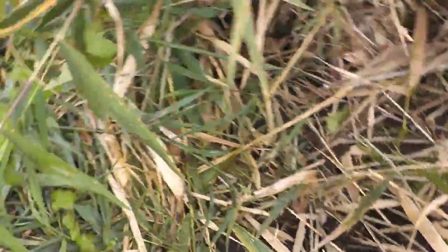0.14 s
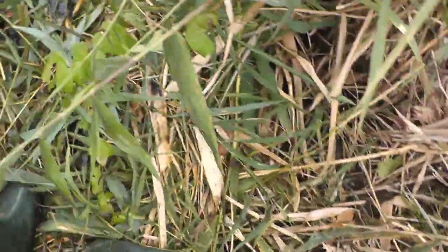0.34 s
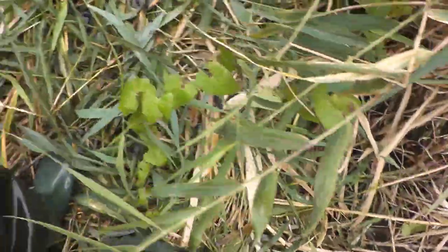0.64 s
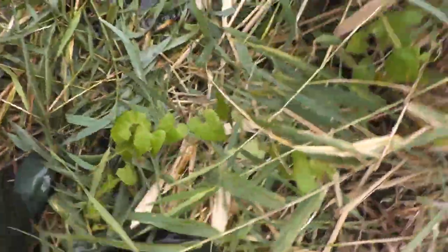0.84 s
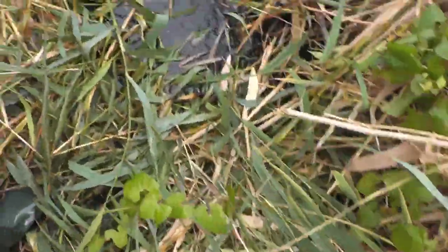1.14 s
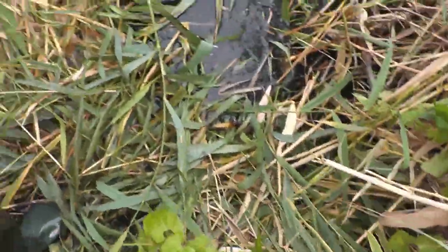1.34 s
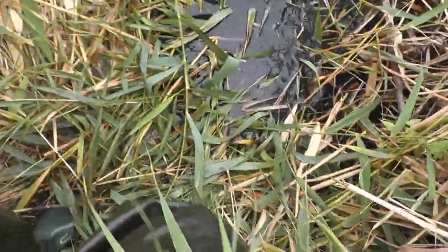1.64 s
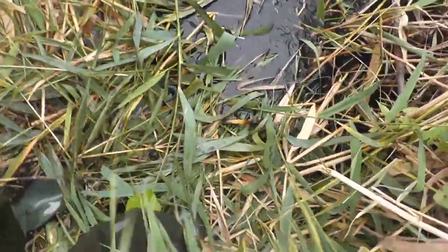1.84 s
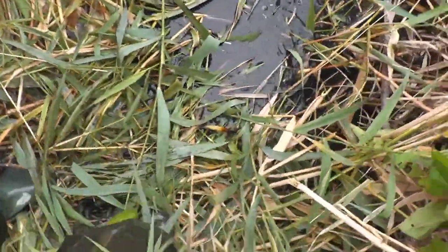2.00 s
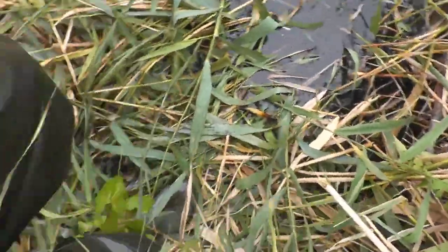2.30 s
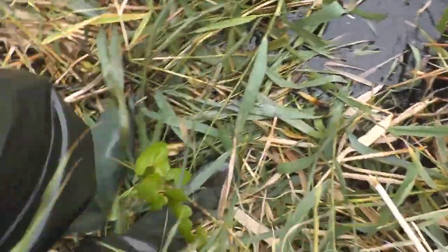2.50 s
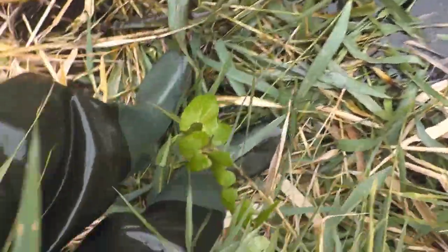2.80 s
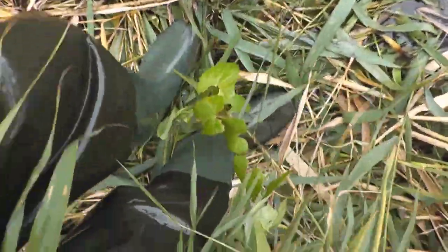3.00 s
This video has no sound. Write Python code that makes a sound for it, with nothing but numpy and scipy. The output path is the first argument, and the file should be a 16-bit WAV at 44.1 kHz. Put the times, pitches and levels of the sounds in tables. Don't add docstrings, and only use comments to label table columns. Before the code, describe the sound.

Dry reeds and grass rustle and snap under rubber boots, with dull low knocks, close up.

```python
import sys
import numpy as np
from scipy import signal
from scipy.fft import rfft, irfft
from scipy.io import wavfile
from scipy.ndimage import uniform_filter1d

SR = 44100
rng = np.random.default_rng(int(sys.argv[2]) if len(sys.argv) > 2 else 0)


def elevation(decibels):
    levels = np.asarray(decibels, float)
    return 10 ** (levels / 20)


def persist_wave(psi):
    counts = np.round(np.clip(psi, -1, 1) * 32767).astype(np.int16)
    wavfile.write(sys.argv[1], SR, np.atleast_2d(counts).T)


N = 138915


def rms_one(x):
    return x / np.sqrt(np.mean(x ** 2) + 1e-20)


def at_hz(points):
    hz, value = np.transpose(points)
    return np.interp(np.log(np.fft.rfftfreq(N, 1 / SR) + 1), np.log(hz + 1), value)


def drift(rate_hz):
    step = 40
    r = np.exp(-2 * step * np.pi * rate_hz / SR)
    settle = 2000
    noise = rng.standard_normal(N // step + settle + 2)
    slow = signal.lfilter([1], [1, -2 * r, r * r], noise)[settle:]
    return np.interp(np.arange(N) / step, np.arange(len(slow)), rms_one(slow))


def swells(rows):
    s, db, rise, fall = np.transpose(rows)[:, :, None]
    dt = np.arange(N) / SR - s
    bell = np.exp(-(dt / np.where(dt < 0, rise, fall)) ** 2)
    return np.sqrt(np.sum(elevation(db) ** 2 * bell, axis=0))


def grains(per_s, spread_db, hiss_share, clump_db):
    born = rng.random(N) < per_s * elevation(clump_db * drift(25)) / SR
    size = elevation(spread_db * np.minimum(rng.exponential(1, N), 4))
    clicks = rms_one(born * size * rng.choice([-1, 1], N))
    clicks = clicks * [np.ones(N), rng.standard_normal(N)]
    hiss = rng.standard_normal((2, N))
    return np.sqrt(1 - hiss_share) * clicks + np.sqrt(hiss_share) * hiss


def colour(x, spectrum, patchy_db, shared_db):
    bins = rfft(x) * elevation(at_hz(spectrum))
    together = drift(9.6)
    place = 2 * np.log2(np.fft.rfftfreq(N, 1 / SR) / 20 + 1e-9)
    out = 0
    for k in range(21):
        band = np.cos(np.pi / 2 * np.clip(place - k, -1, 1)) ** 2
        flicker = elevation(patchy_db * drift(13.6) + shared_db * together)
        out = out + irfft(bins * band, N) * flicker
    return out / np.sqrt(np.mean(out[0] ** 2))


# frequency in Hz, level in dB.
AIR_COLOUR = [(20, -15), (60, -16), (150, -6.5), (400, -5), (900, -11.5), (3000, -15), (7000, -23),
              (16000, -31)]


def far_air():
    noise = rng.standard_normal((2, N))
    return elevation(-48) * colour(noise, AIR_COLOUR, patchy_db=1.0, shared_db=-2.5)


# start in seconds, lift over the rustle in dB.
STEM_TICKS = [(0.0847, 2.0), (0.1164, -5), (0.2376, -10), (0.247, -5.1), (0.267, -4.3), (0.273, -22),
              (0.2843, -6.6), (0.3005, -13), (0.3164, -6.5), (0.3753, -0.5), (0.4704, 11.5), (0.498, 5),
              (0.5527, 5), (0.5746, 3.2), (0.5965, -2), (0.6133, 8.5), (0.703, -8), (0.73, -3), (0.74, 2),
              (0.7617, -17), (0.7776, -5.7), (0.7977, -0.5), (0.8168, -10), (0.9837, -8), (1.0338, 0),
              (1.092, 3), (1.392, -9), (1.6955, -1), (1.715, 0.8), (1.9126, -9), (1.9854, -6), (2.0035, 4),
              (2.1665, -6), (2.171, -8), (2.2672, -8), (2.327, 0), (2.431, 2), (2.4744, -7), (2.505, 6),
              (2.547, 3), (2.5613, -4), (2.575, -2), (2.5927, 3), (2.626, -4), (2.6337, 3), (2.637, 1),
              (2.7014, 4), (2.734, 4), (2.745, 5), (2.7669, -1), (2.8245, 5.6), (2.837, -3), (2.842, -2),
              (2.942, 0.6), (2.9589, -7), (2.9958, 9)]


def stem_ticks():
    faint_per_s, faint_db, spread_db, fade_s = 150, -11, 2.5, 0.0017
    chance = rng.random(N) < faint_per_s / SR
    born = chance * elevation(faint_db + spread_db * np.minimum(rng.exponential(1, N), 2))
    s, db = np.transpose(STEM_TICKS)
    born[(s * SR).astype(int)] = elevation(db)
    lift = 1 + signal.lfilter([1], [1, -np.exp(-1 / (fade_s * SR))], born)
    return lift / np.sqrt(np.mean(lift ** 2))


# peak time in seconds, level in dB, rise and fall in seconds.
LEG_SWEEPS = [(0.087, -39.5, 0.103, 0.019), (0.114, -28, 0.011, 0.058), (0.148, -32, 0.034, 0.042),
              (0.296, -21.5, 0.044, 0.046), (0.382, -30.5, 0.02, 0.026), (0.486, -36, 0.072, 0.074),
              (0.61, -36, 0.084, 0.13), (0.778, -24.5, 0.09, 0.058), (0.985, -25, 0.029, 0.033),
              (1.05, -36.0, 0.25, 0.086), (1.281, -42.5, 0.025, 0.051), (1.432, -33.5, 0.045, 0.064),
              (1.577, -43.5, 0.083, 0.033), (1.745, -40, 0.26, 0.08), (1.868, -25.5, 0.047, 0.066),
              (1.995, -33, 0.015, 0.049), (2.066, -29, 0.03, 0.086), (2.167, -31, 0.0085, 0.0073),
              (2.26, -30.5, 0.069, 0.2), (2.471, -31.0, 0.017, 0.11), (2.59, -26.5, 0.04, 0.064),
              (2.762, -41, 0.179, 0.01), (2.83, -40.5, 0.0092, 0.061), (2.989, -38, 0.23, 0.055),
              (3.027, -38, 0.012, 0.092), (3.149, -29.5, 0.014, 0.047)]
# frequency in Hz, level in dB.
REED_COLOUR = [(30, -14), (100, -13.5), (300, -11), (700, -6), (1700, -2.5), (3400, -4), (7000, -0.5),
               (16000, -10.5)]


def reed_rustle():
    crackle = grains(per_s=4000, spread_db=3, hiss_share=0.62, clump_db=2.0)
    rustle = colour(stem_ticks() * crackle, REED_COLOUR, patchy_db=0.66, shared_db=0.14)
    return elevation(0.5) * swells(LEG_SWEEPS) * rustle


def even(x):
    bins = rfft(x)
    return irfft(bins / uniform_filter1d(np.abs(bins), size=9), x.shape[-1])


def snap_shape(t, fall_s):
    rise_s, tail_db, crack_db, crack_s = 0.0001, -13, 5.5, 0.00014
    body = np.exp(-(t / fall_s) ** 4) + elevation(tail_db) * np.exp(-t / (2 * fall_s))
    crack = elevation(crack_db) * t / crack_s * np.exp(-t / crack_s)
    return (1 - np.exp(-t / rise_s)) * body + crack


# start in seconds, bright peak in dB, hollow peak in dB, hollow pitch in Hz.
STEM_SNAPS = [(.0518, -29, -56, 4200), (0.1087, -19, -25.5, 2500), (0.1485, -15, -49, 4430),
              (0.3376, -8.5, -23.5, 3370), (0.3442, -13, -40, 3000), (0.384, -21, -40, 3500),
              (0.4005, -15.5, -38, 3900), (0.463, -28, -33.5, 1420), (0.582, -35, -32, 4150),
              (0.6518, -19.5, -38, 4240), (0.9015, -23, -40, 1420), (0.989, -9.5, -20.5, 3150),
              (1.0577, -36, -32.5, 2800), (1.249, -40, -42, 1820), (1.402, -20.5, -46, 1200),
              (2.0512, -17.5, -31, 3600), (2.0697, -17.5, -29, 1580), (2.0945, -18, -35, 1160),
              (2.1015, -18, -34, 890), (2.1296, -7, -23.5, 1290), (2.2235, -19, -44, 4360),
              (2.397, -22, -37, 2500), (2.4605, -14, -33, 1990), (2.509, -16, -49, 3000),
              (2.539, -24, -33, 1660), (2.778, -25.5, -49, 3430), (2.8724, -21, -44, 3160),
              (2.98, -27, -40, 2220), (3.0288, -24, -39, 1800), (3.0338, -19, -33, 1850),
              (0.103, -40, -36, 1800), (.5506, -32, -47, 3520), (.6105, -23, -40, 1600),
              (0.9892, -30, -29.5, 1470), (1.058, -26, -40.5, 1070), (1.377, -27, -42.5, 1500),
              (1.7125, -25, -52, 4000), (2.1305, -31, -24.5, 3780), (2.5125, -22, -40, 4300),
              (2.652, -30, -37, 1520), (2.9957, -31, -48, 2980), (2.131, -30, -26.5, 2290),
              (2.4606, -34, -37, 3500), (2.07, -32, -31.5, 3570), (.338, -30, -33, 2100),
              (.468, -31, -37, 3600), (.153, -16, -40, 3800), (2.876, -37, -41, 3000),
              (2.7675, -34, -44.5, 3300), (2.9435, -34, -40, 3500)]


def stem_snaps():
    hollow_spread, hollow_lift_db = 1.185, 9.5
    out = np.zeros((2, N + SR))
    t = np.arange(int(0.018 * SR)) / SR
    for s, bright_db, hollow_db, hz in STEM_SNAPS:
        bright = (bright_db, (4970, 11000), 0.0026)
        hollow = (hollow_db + hollow_lift_db, (hz / hollow_spread, hz * hollow_spread), 0.003)
        for db, band_hz, fall_s in (bright, hollow):
            burst = even(rng.standard_normal((2, len(t))) * snap_shape(t, fall_s))
            sos = signal.butter(2, band_hz, "band", fs=SR, output="sos")
            burst = signal.sosfilt(sos, burst)
            start = int(s * SR)
            out[:, start:start + len(t)] += elevation(db) * burst / np.abs(burst[0]).max()
    return out[:, :N] * elevation([[0], [-2.5]])


# peak time in seconds, level in dB, rise and fall in seconds.
BOOT_FLEXES = [(.15, -42.5, 0.051, 0.034), (.3, -46, 0.019, 0.056), (1.87, -42, 0.071, 0.049),
               (.6, -42.5, 0.019, 0.023), (.8, -41.5, 0.076, 0.058), (.96, -37, 0.038, 0.064),
               (1.13, -49, .02, 0.039), (1.52, -41.5, 0.025, 0.023), (1.58, -46, 0.017, 0.046),
               (1.7, -51.5, 0.04, 0.05), (2.13, -39.5, 0.066, 0.19), (2.3, -41.5, 0.041, 0.05),
               (2.63, -40.5, 0.16, 0.057), (2.74, -47, 0.023, 0.02), (2.84, -43, 0.019, 0.029),
               (2.9, -45.5, 0.023, 0.022), (3.1, -48.5, 0.067, .1)]
# frequency in Hz, level in dB.
RUBBER_COLOUR = [(40, -43), (120, -11.5), (280, -1), (550, -1), (900, -9.5), (1500, -53), (3000, -75)]


def rubber_flex():
    rub = grains(per_s=300, spread_db=2, hiss_share=0.55, clump_db=3.5)
    rub = swells(BOOT_FLEXES) * colour(rub, RUBBER_COLOUR, patchy_db=2.0, shared_db=-1.0)
    return rub * elevation([[0], [0.5]])


# crest time in seconds, peak in dB, pitch in Hz, ring in cycles.
BOOT_KNOCKS = [(0.1576, -23.5, 250, 0.65), (0.5443, -29.5, 283, 1.25), (0.6036, -25, 298, 0.73),
               (0.976, -21.5, 219, 0.59), (.991, -17.5, 606, 1.4), (1.0591, -28, 617, 1.1),
               (1.5402, -26, 300, .7), (1.582, -27, 292, 0.6), (1.609, -25.5, 466, 1.8),
               (1.785, -16.5, 320, 0.63), (1.86, -20, 394, 0.53), (1.8895, -23.5, 654, 1.2),
               (2.1313, -11, 495, 0.18), (2.2608, -19.5, 390, 0.35), (2.2983, -14, 440, 0.59),
               (2.315, -30, 380, 0.58), (2.3752, -24, 424, 0.89), (2.6298, -23, 560, 0.68),
               (2.83, -25, 348, 0.8), (2.8968, -29, 250, 0.73), (3.046, -30, 350, 0.58),
               (3.1021, -33, 284, 0.72), (1.5079, -32, 295, 2), (1.5276, -33, 285, 2.8),
               (1.5635, -34, 560, 1.5), (1.5704, -34.5, 250, 2.2), (1.6128, -30, 473, 0.98),
               (2.328, -38, 620, .8), (2.349, -26, 450, 0.69), (2.387, -28, 400, 0.64),
               (2.82, -39, 380, 1.2)]


def boot_knocks():
    rise_cycles, low_cut_hz = 0.15, 121
    out = np.zeros(N)
    t = np.arange(N) / SR
    for s, db, hz, cycles in BOOT_KNOCKS:
        near = slice(int((s - 0.02) * SR), int((s + 0.037) * SR))
        turns = (t[near] - s) * hz
        shape = np.where(turns < 0, np.exp(-(turns / rise_cycles) ** 2), np.exp(-turns / cycles))
        out[near] += elevation(db) * shape * np.cos(2 * np.pi * turns)
    sos = signal.butter(2, low_cut_hz, "high", fs=SR, output="sos")
    return signal.sosfilt(sos, out) * [[1], [0]]


# frequency in Hz, level in dB.
HOUSING = [(800, 1.5), (980, -3), (1200, -1), (2200, -5), (3600, 0), (4700, -2), (7400, 4), (11000, -5.5)]
# frequency in Hz, level of unshared sound in dB.
STEREO_WIDTH = [(60, 0.5), (125, -7), (700, -11.5), (2200, -13), (3500, -18), (5500, -35), (8000, -11),
                (14000, -5)]
# frequency in Hz, left minus right in dB.
LEFT_TILT = [(30, 0.5), (250, -1.5), (1000, 4), (2000, 3.5), (4000, -0.5), (8000, 1.6), (13000, 0.5)]
# frequency in Hz, lead of the left in radians.
LEFT_LEAD = [(0, -0.61), (690, 0.7), (2410, 0.37), (7150, 0.2), (12400, -0.74), (15900, -0.26)]


def microphone_ports(x):
    mid, side = rfft(x) * elevation(at_hz(HOUSING))
    side = side * elevation(at_hz(STEREO_WIDTH))
    half = elevation(at_hz(LEFT_TILT) / 2) * np.exp(0.5j * at_hz(LEFT_LEAD))
    return irfft(np.array([(mid + side) * half, (mid - side) / half]), N)


def scene():
    return microphone_ports(far_air() + reed_rustle() + stem_snaps() + rubber_flex() + boot_knocks())


def top_cut(x):
    return signal.sosfilt(signal.butter(12, 15900, fs=SR, output="sos"), x)


def record(dry):
    top_hz = 15720
    below_top = np.fft.rfftfreq(N, 1 / SR) < top_hz
    mix = irfft(rfft(dry) * below_top, N)
    return top_cut(mix)


dry = scene()
out = record(dry)
persist_wave(out)
```